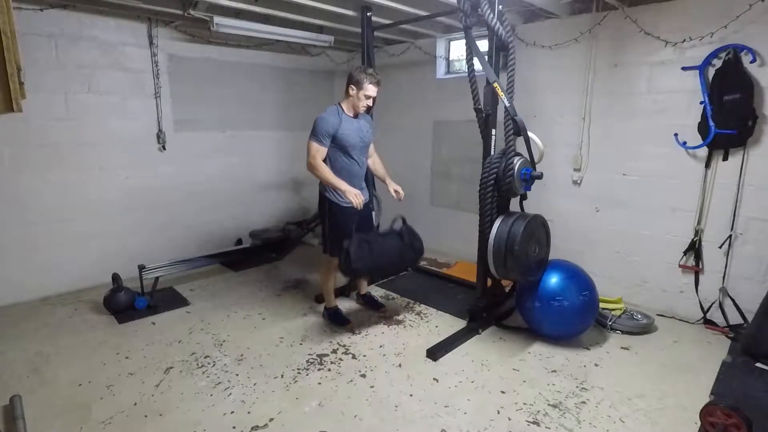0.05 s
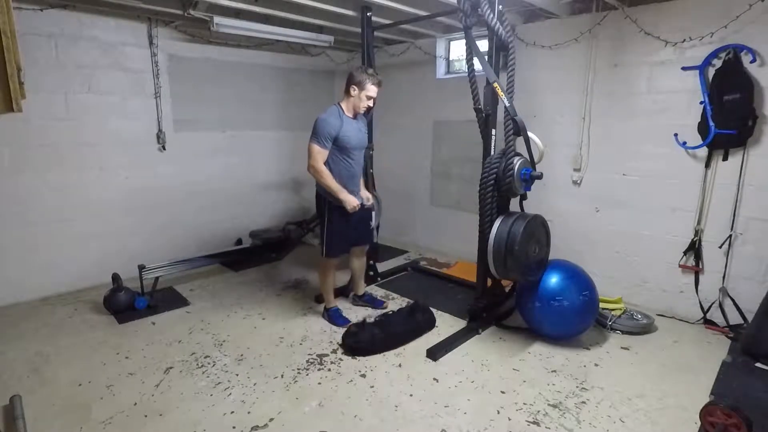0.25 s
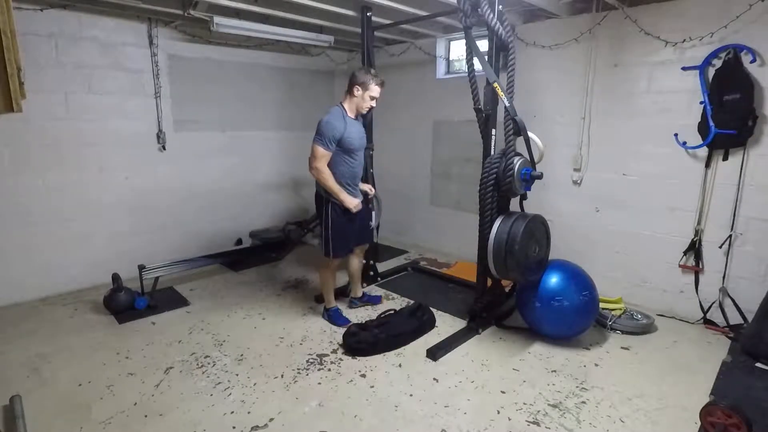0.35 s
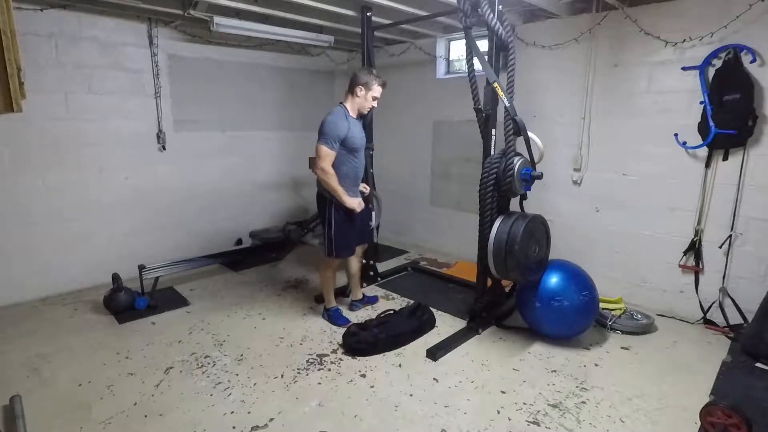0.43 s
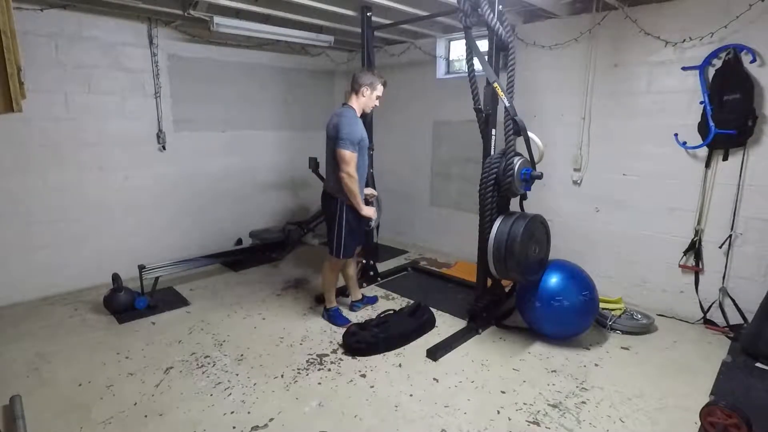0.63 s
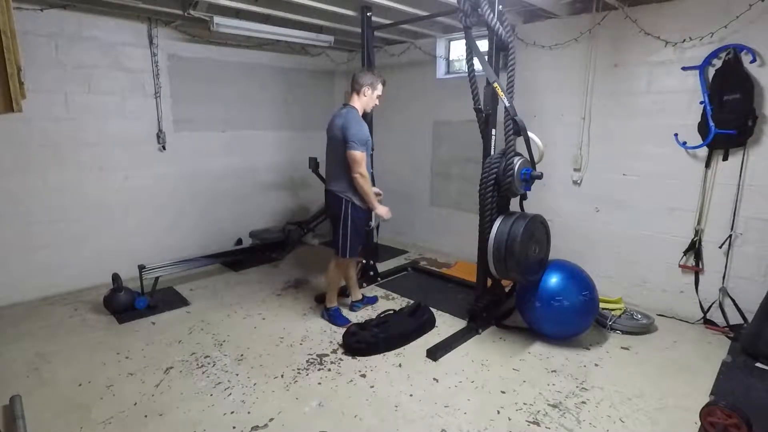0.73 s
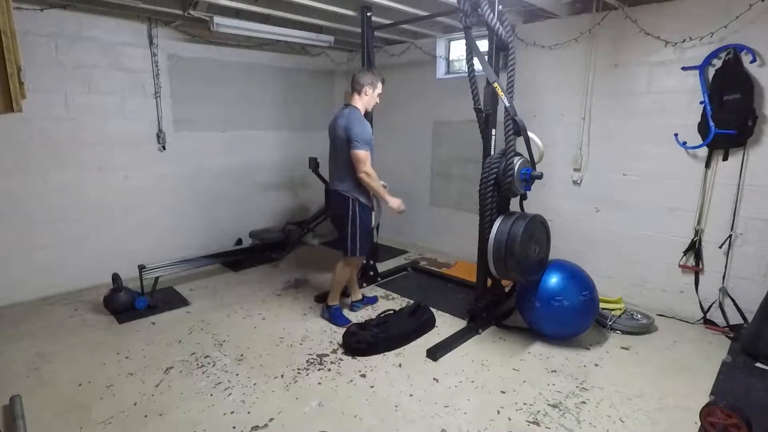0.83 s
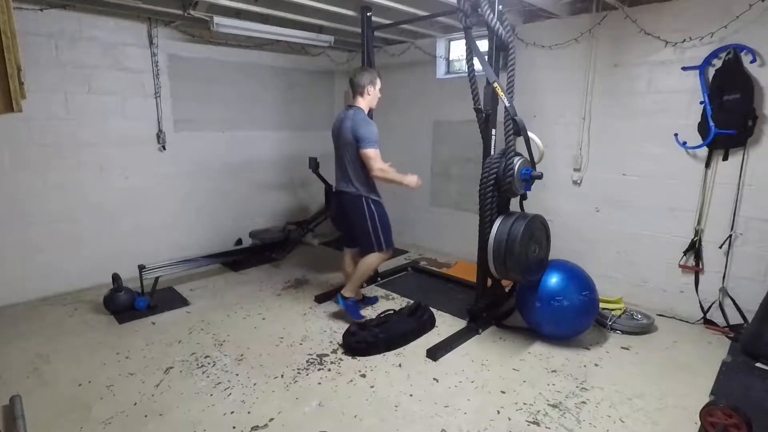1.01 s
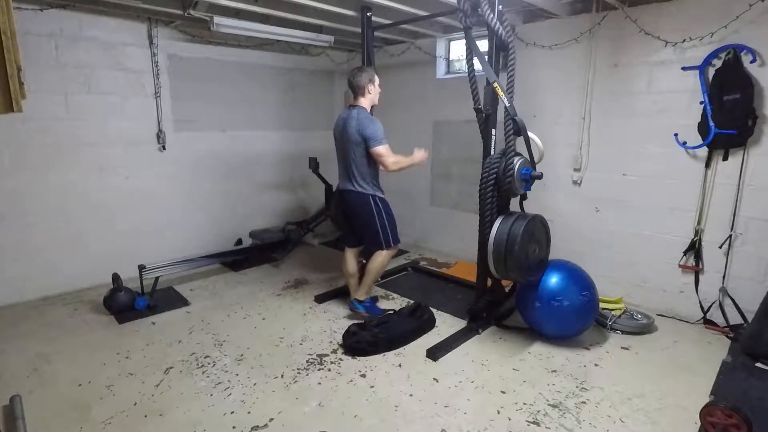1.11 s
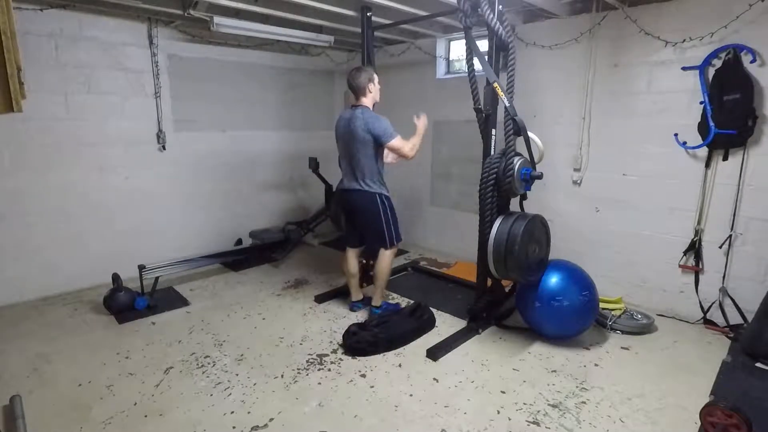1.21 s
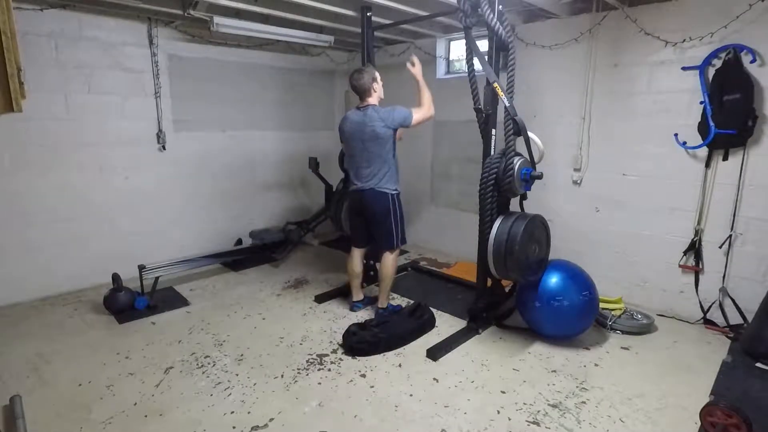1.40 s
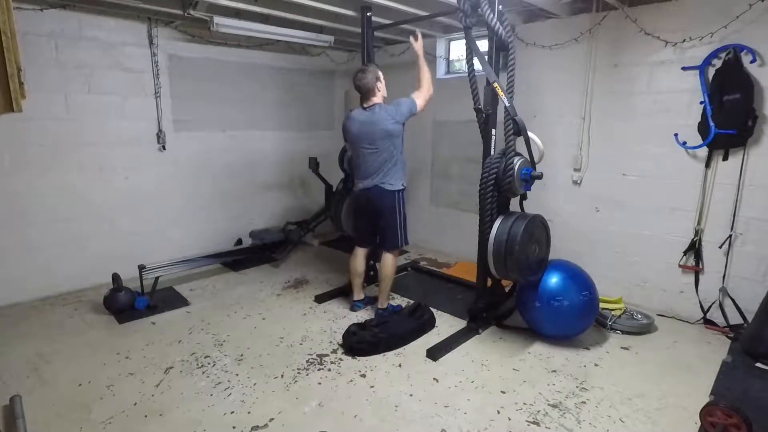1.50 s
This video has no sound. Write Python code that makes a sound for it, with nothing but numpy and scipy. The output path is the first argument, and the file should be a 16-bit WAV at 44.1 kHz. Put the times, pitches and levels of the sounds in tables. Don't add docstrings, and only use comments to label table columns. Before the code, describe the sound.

A heavy sandbag thuds onto concrete at 0.2 s, over a faint, fading metallic room ring. Several folds land within 0.05 s, giving a deep boom, hollow slap and gritty nylon hiss that die quickly in the small basement. Soles turn softly on grit from 0.5 s; low rumble swells around 0.8-1.28 s. Soft pulses repeat every 0.1 s until 1.5 s, with light scuffs near 1.27 s and cloth rubs at 1.49 s.

```python
import sys
import numpy as np
from scipy import signal
from scipy.fft import rfft, irfft, next_fast_len
from scipy.io import wavfile
from scipy.ndimage import uniform_filter1d

SR = 44100
rng = np.random.default_rng(int(sys.argv[2]) if len(sys.argv) > 2 else 0)


def inscribe(sig):
    pcm = np.round(np.clip(np.atleast_2d(sig).T, -1, 1) * 32767)
    wavfile.write(sys.argv[1], SR, pcm.astype(np.int16))


def volts_from_db(level):
    exponent = np.asarray(level, float) / 20
    return 10 ** exponent


N = 68355

# start in seconds, push level in dB, contact length in seconds.
FOLDS = [
    (0.2039, -14, 0.00492),
    (0.2108, -7, 0.00357),
    (.2255, -6, 0.0046),
    (0.2382, -8.5, 0.00385),
    (.2505, -12.5, 0.00486),
]
# frequency in Hz, t60 in seconds.
ROOM = [(60, 0.65), (250, 0.39), (1000, 0.95), (3000, 0.61), (6000, 0.69), (9000, 0.8), (13000, 0.67)]
# frequency in Hz, level in dB per Hz.
SPRAY = [(2500, -60), (3700, -17), (5900, 1), (7600, -11.5), (9500, -17.5), (11300, -31), (12900, -24),
         (15200, -38)]
IMPACT_S = FOLDS[0][0]


def unit(x):
    return x / np.sqrt(np.mean(x ** 2) + 1e-20)


def along(points, hz):
    f, value = np.transpose(points)
    return np.interp(np.log(hz + 1), np.log(f + 1), value)


def filtered(x, response):
    m = next_fast_len(N + SR // 2)
    return irfft(rfft(x, m) * response(np.fft.rfftfreq(m, 1 / SR)), m)[:N]


def peak(f, hz, width_hz):
    return 1j * f * width_hz / (hz * hz - f * f + 1j * f * width_hz)


def band(hz, width_hz):
    return unit(filtered(rng.standard_normal(N), lambda f: peak(f, hz, width_hz) ** 2))


def hiss(spectrum, patchy_db=1.5, fade_db=lambda hz, t: 0 * t):
    noise = filtered(rng.standard_normal(N), lambda f: volts_from_db(along(spectrum, f)) * (f > 15))
    hz, t, z = signal.stft(unit(noise), SR, nperseg=512)
    patches = uniform_filter1d(rng.standard_normal(z.shape), 5, 0)
    patches = unit(uniform_filter1d(patches, 6, 1))
    gain_db = patchy_db * patches + fade_db(hz[:, None], t[None])
    return signal.istft(z * volts_from_db(gain_db), SR, nperseg=512)[1][:N]


def since(s):
    return np.maximum(np.arange(N) / SR - s, 0)


def rise(s, rise_s):
    return 1 - np.exp(-since(s) / rise_s)


def decay(level_db, s, t60_s):
    return volts_from_db(level_db - 60 * since(s) / t60_s)


def still_air():
    # frequency in Hz, level in dB per Hz.
    room_tone = [(15, -30), (35, 1), (200, -8), (300, -15), (900, -26.5), (1600, -24.5), (2500, -31.5),
                 (3600, -48)]
    # frequency in Hz, level in dB per Hz.
    self_noise = [(2000, -9), (3500, -3), (5800, 0), (8000, -6.5), (9300, -2), (10800, -6), (12000, -17),
                  (14800, -32)]
    return volts_from_db(-43.5) * hiss(room_tone, 0.62) + volts_from_db(-63) * hiss(self_noise, 0.6)


def house_rumble():
    # time in seconds, level in dB.
    swell = [(0.801, -43.5), (.88, -39.5), (.96, -38.5), (1.03, -35.5), (1.1, -38), (1.2, -36.5),
             (1.279, -47)]
    # frequency in Hz, level in dB per Hz.
    colour = [(20, -26), (55, 3.5), (80, 2), (120, -6), (160, -0.5), (235, -7), (275, -41), (400, -120)]
    s, db = np.transpose(swell)
    return volts_from_db(np.interp(since(0), s, db, left=-90, right=-90)) * hiss(colour, 0.41)


def pressure_pulses():
    pulse_db = [
        -21,
        -24.5,
        -22,
        -23.5,
        -27,
        -22,
        -27,
        -39,
    ]
    last_s, every_s, width_s = 1.4866, 0.1022, 0.0023
    leak_hz, mic_low_hz = 29.7, 6.2
    bumps = np.zeros(N)
    for k, db in enumerate(pulse_db):
        offset_s = since(0) - last_s + k * every_s
        bumps += volts_from_db(db) * np.exp(-0.5 * (offset_s / width_s) ** 2)
    return filtered(bumps, lambda f: 1j * f / (1j * f + leak_hz) * 1j * f / (1j * f + mic_low_hz))


def last_lift():
    # frequency in Hz, level in dB per Hz.
    earlier = [(18, -56), (30, -2), (180, -5.5), (234, -14), (415, -13), (1410, -27), (4090, -33.5),
               (5580, -21.5), (15000, -64)]
    # frequency in Hz, width in Hz, level in dB, t60 in seconds.
    plates = [(5640, 75, -46, 0.92), (4740, 38, -60, 1.8), (6100, 400, -58, 0.68), (81, 79, -33, 4.6),
              (190, 47, -38.5, 2.4), (298, 300, -45, 4)]
    ring = sum(decay(db, 0, t60_s) * band(hz, width_hz) for hz, width_hz, db, t60_s in plates)
    tail = decay(-32, 0, 0.95) * hiss(earlier, 1.4)
    return (tail + ring) * volts_from_db(-30 * since(0.26))


def feet():
    # frequency in Hz, level in dB per Hz.
    grit = [(150, -30), (250, 9), (420, 0.5), (800, -4.5), (1800, -17.5), (2800, -37)]
    # start in seconds, level in dB, centre in Hz, width in Hz, t60 in seconds.
    scuffs = [
        (1.269, -47, 1350, 500, .2),
        (1.276, -48, 545, 100, .15),
        (1.284, -53, 900, 300, .3),
        (1.268, -52, 2000, 500, .1),
        (1.487, -54, 6000, 900, .8),
        (1.487, -54, 8300, 3500, .1),
        (1.490, -51, 4800, 1200, .14),
        (1.005, -36, 85, 50, .6),
    ]
    turn = decay(-47.5, 0.892, 0.46) * rise(0.49, 0.046) * hiss(grit, 2.8)
    rubs = sum(decay(db, s, t60_s) * rise(s, 0.0023) * band(hz, width_hz)
               for s, db, hz, width_hz, t60_s in scuffs)
    return turn + rubs


def settling(hold_s):
    collapse_db_per_s2 = 289

    def fade_db(hz, t):
        after_s = np.maximum(t - IMPACT_S, 0)
        room_db = -60 * np.maximum(t - IMPACT_S - hold_s, 0) / along(ROOM, hz)
        return room_db - collapse_db_per_s2 * after_s ** 2
    return fade_db


def slab_push():
    start_s, slab_hz = 0.1940, 125
    tone = np.sin(2 * np.pi * slab_hz * since(start_s))
    return -decay(-17, start_s, 0.045) * tone * rise(start_s, 0.0027)


def push(s, length_s):
    u = since(s) / length_s
    return np.sin(np.pi * u) * (u < 2)


def folds_landing():
    return sum((-1) ** (s > IMPACT_S) * volts_from_db(db) * push(s, length_s) for s, db, length_s in FOLDS)


def boom():
    # frequency in Hz, level in dB, t60 in seconds.
    modes = [(68.35, -14.5, 0.72), (83.9, -16, 0.55), (109, -13, 0.15), (162.3, -12, 0.57),
             (194.2, -10.5, 0.49), (243.6, -3.5, 0.3), (285.3, -21, 0.22), (320, -18.5, 0.46),
             (367, -15.5, 0.4), (387.4, -18.5, 0.39), (426, -9, .2), (497, -18.5, 0.31), (543.6, -17, .2),
             (640, -36, .3)]
    sag, sag_s, shiver_rad = 0.04, 0.05, 0.44
    t = since(IMPACT_S)
    bent_s = t + sag * sag_s * (1 - np.exp(-t / sag_s))
    ringing = np.zeros(N)
    for k, (hz, db, t60_s) in enumerate(modes):
        phase = 2 * np.pi * hz * bent_s + shiver_rad * band(7, 16)
        ringing += (-1) ** k * decay(db, IMPACT_S, t60_s) * np.sin(phase)
    return volts_from_db(-3.5) * rise(IMPACT_S, 0.022) * ringing


def slap():
    # frequency in Hz, level in dB per Hz.
    near_colour = [(45, -38), (65, -13), (250, -4), (550, -14), (850, -25), (2300, -26), (3300, -38.5),
                   (5000, -76)]
    # frequency in Hz, level in dB per Hz.
    far_colour = [(45, -44), (70, 10), (300, -5.5), (1200, -21.5), (2400, -32), (3400, -49), (6000, -18.5),
                  (15000, -51)]
    # frequency in Hz, width in Hz, level in dB, t60 in seconds.
    clack = [(2001, 234, -23, 0.25), (1382, 170, -30.5, .2), (1062, 190, -31.5, 0.45),
             (9200, 220, -46.5, 0.77)]
    near = volts_from_db(-14) * hiss(near_colour, 1.1, settling(hold_s=0.027))
    notes = sum(decay(db, IMPACT_S, t60_s) * band(hz, width_hz) for hz, width_hz, db, t60_s in clack)
    far = decay(-31, IMPACT_S, 1.77) * hiss(far_colour, 0.47)
    return rise(IMPACT_S + 0.0013, 0.001) * (near + notes + far)


def sand_and_cloth():
    spray = volts_from_db(-21.5) * rise(IMPACT_S, 0.0035) * hiss(SPRAY, 1.4, settling(hold_s=0.012))
    swell = np.minimum(np.exp((since(0) - IMPACT_S) / 0.013), 1)
    swish = decay(-38.5, IMPACT_S, 0.086) * swell * rise(0.185, 0.004) * hiss(SPRAY, 1.7)
    return spray + swish


def sandbag():
    return slab_push() + folds_landing() + boom() + slap() + sand_and_cloth()


def scene():
    background = still_air() + house_rumble() + pressure_pulses() + last_lift()
    return (background + feet() + sandbag())[None]


def top_cut(x):
    return signal.sosfilt(signal.butter(12, 15230, fs=SR, output="sos"), x)


def record(dry):
    ceiling = 0.97
    mix = dry / (1 + np.abs(dry / ceiling) ** 8) ** (1 / 8)
    return top_cut(mix)


dry = scene()
out = record(dry)
inscribe(out)
```